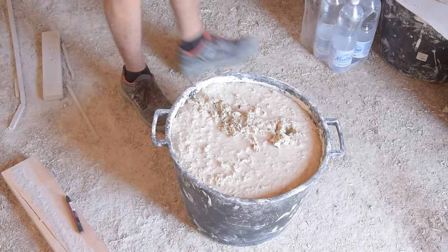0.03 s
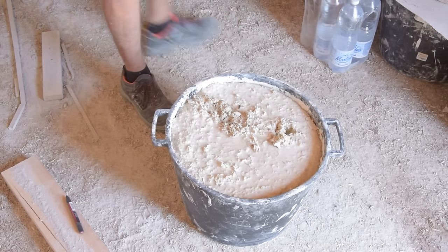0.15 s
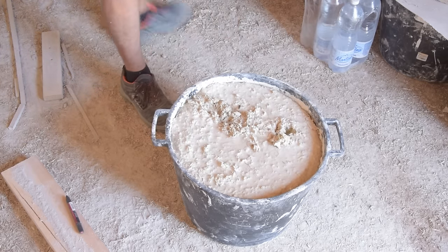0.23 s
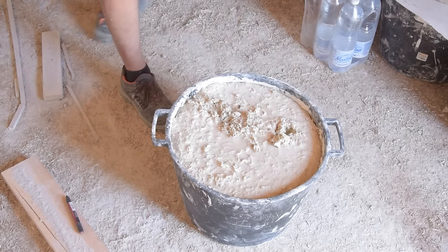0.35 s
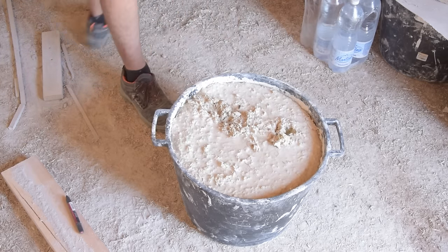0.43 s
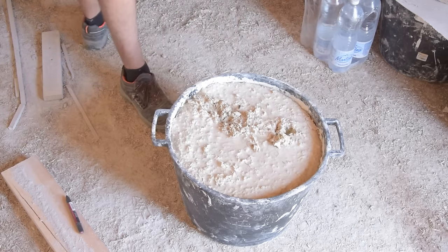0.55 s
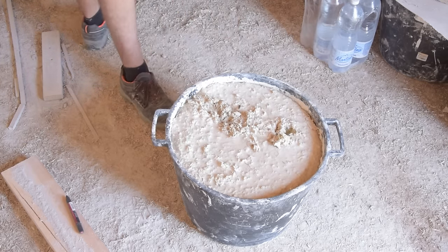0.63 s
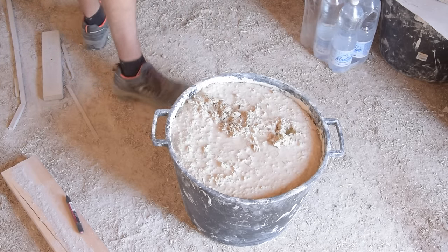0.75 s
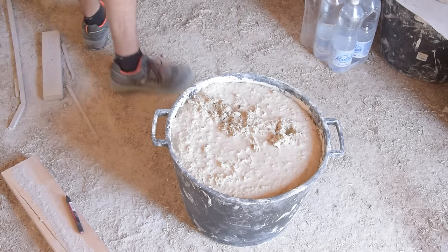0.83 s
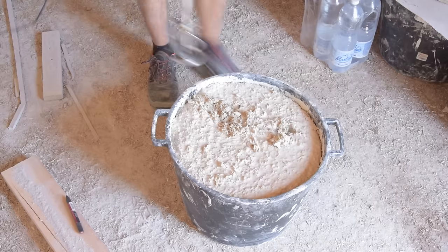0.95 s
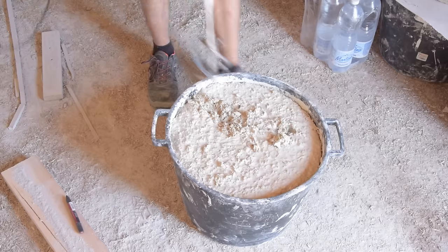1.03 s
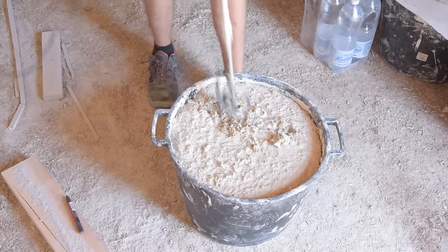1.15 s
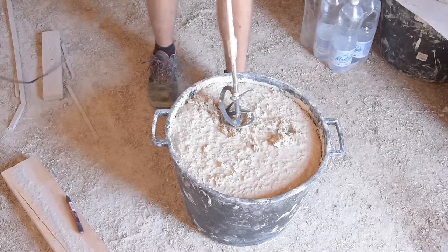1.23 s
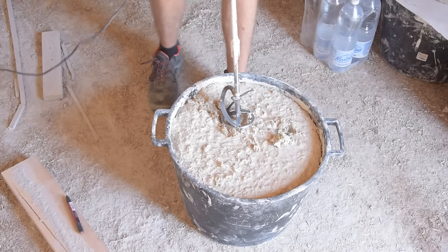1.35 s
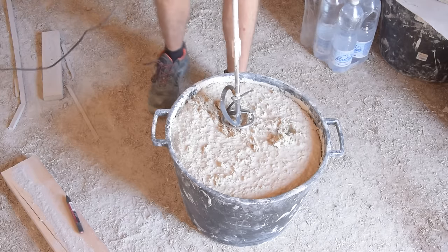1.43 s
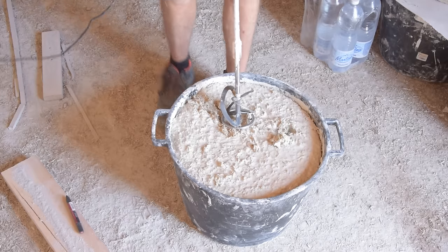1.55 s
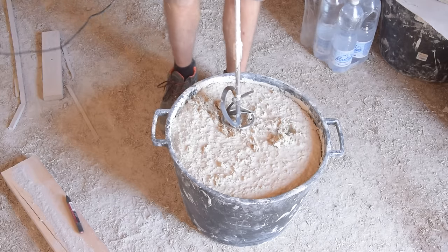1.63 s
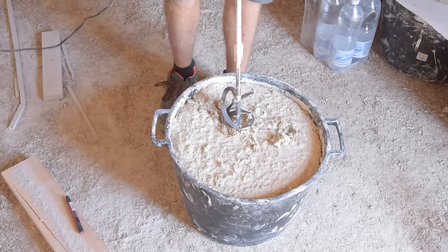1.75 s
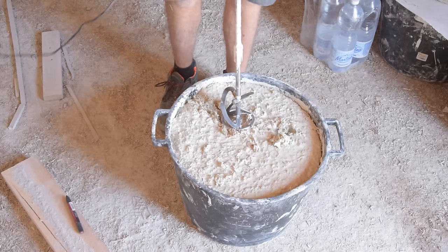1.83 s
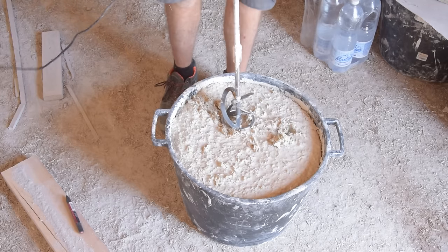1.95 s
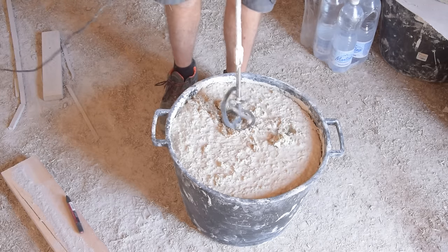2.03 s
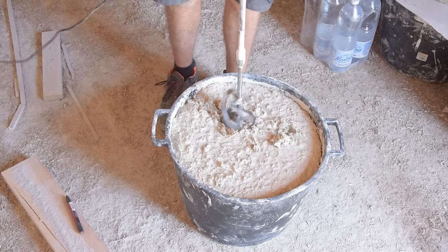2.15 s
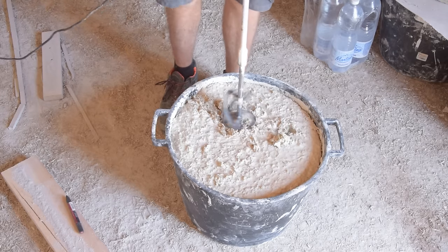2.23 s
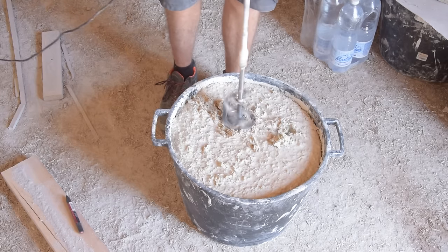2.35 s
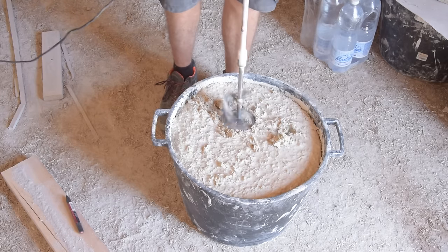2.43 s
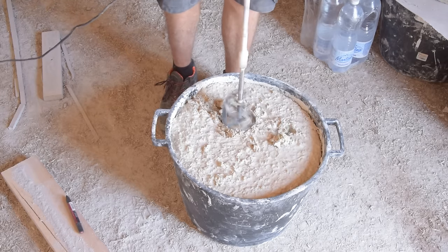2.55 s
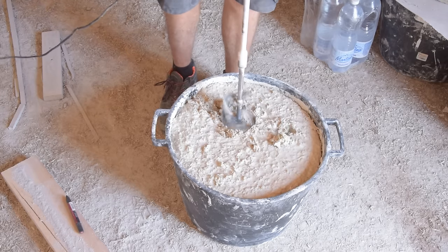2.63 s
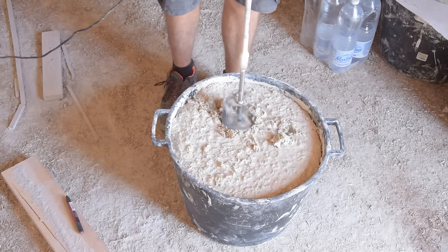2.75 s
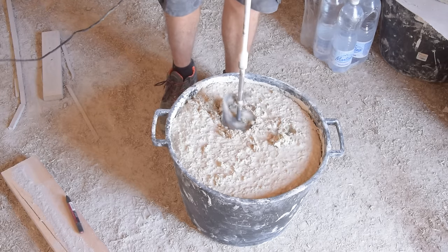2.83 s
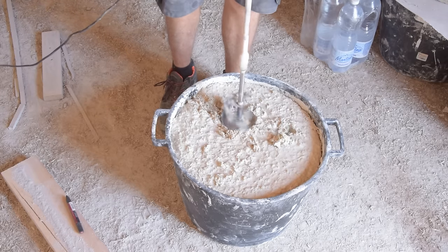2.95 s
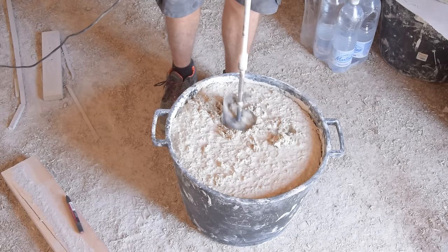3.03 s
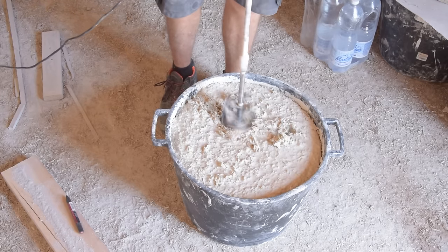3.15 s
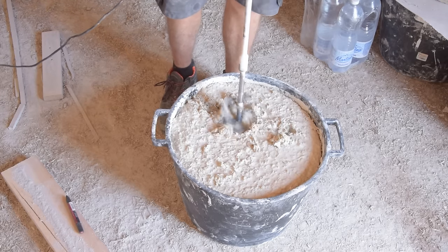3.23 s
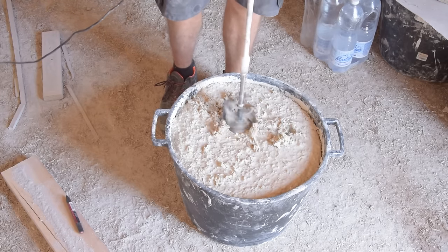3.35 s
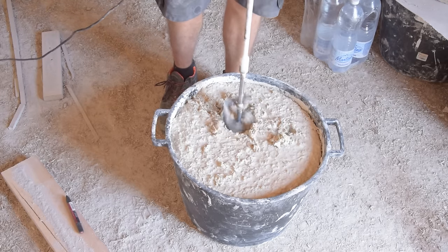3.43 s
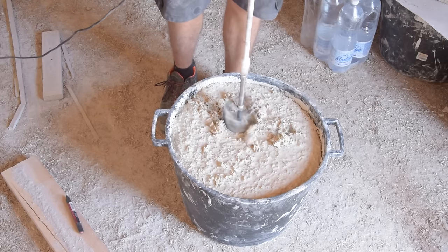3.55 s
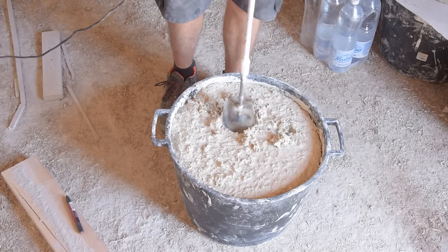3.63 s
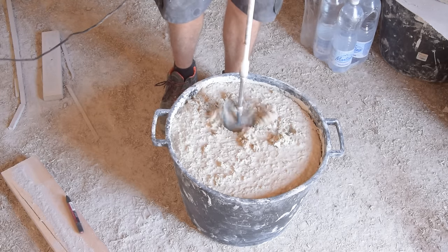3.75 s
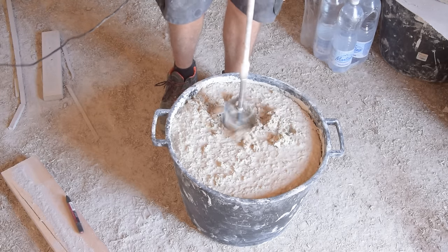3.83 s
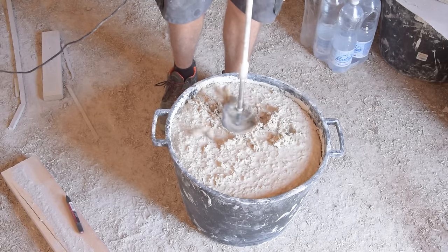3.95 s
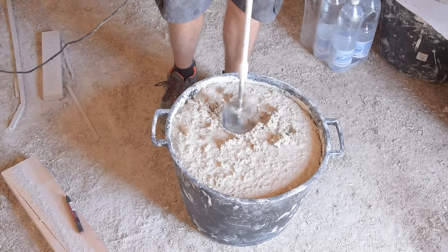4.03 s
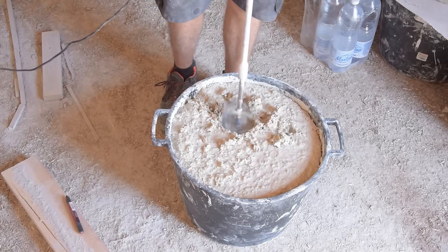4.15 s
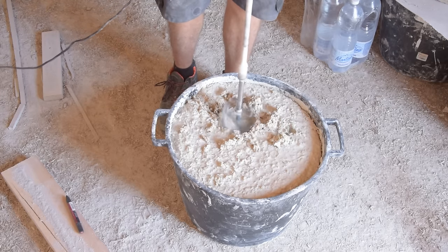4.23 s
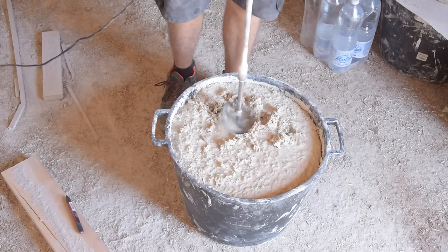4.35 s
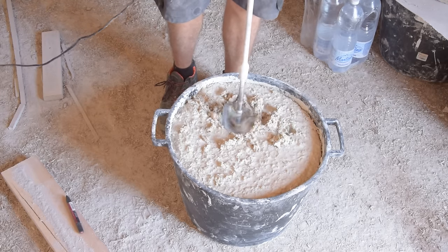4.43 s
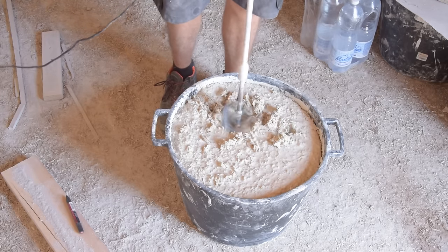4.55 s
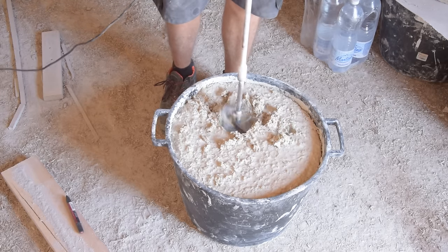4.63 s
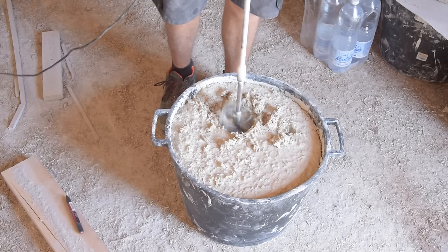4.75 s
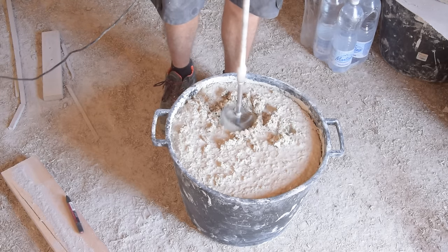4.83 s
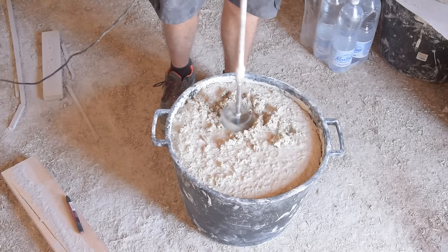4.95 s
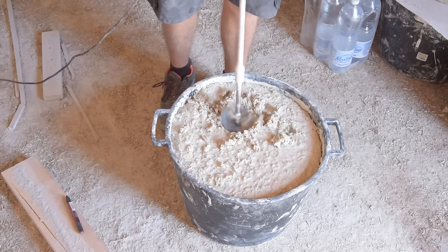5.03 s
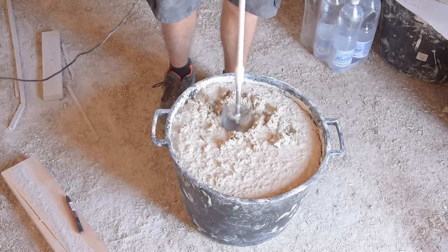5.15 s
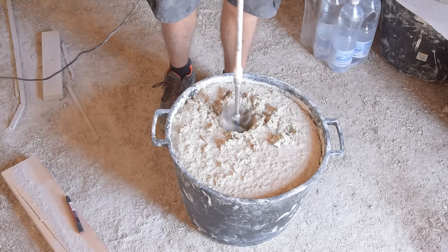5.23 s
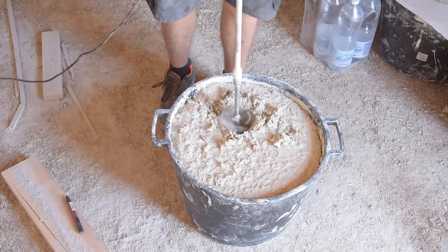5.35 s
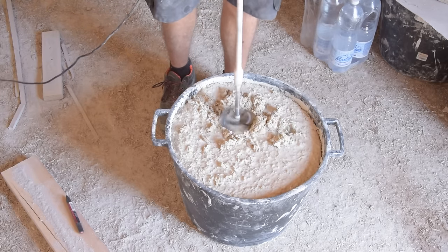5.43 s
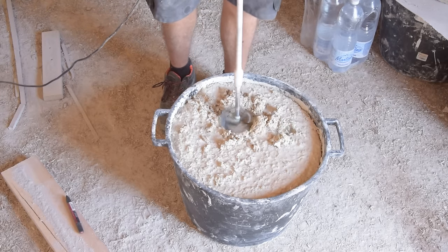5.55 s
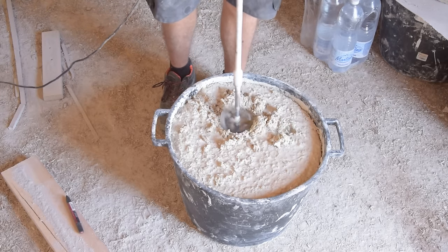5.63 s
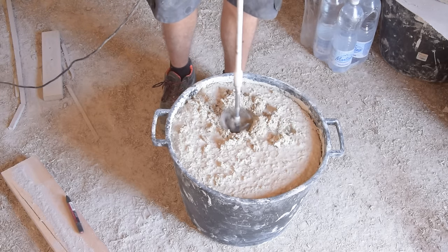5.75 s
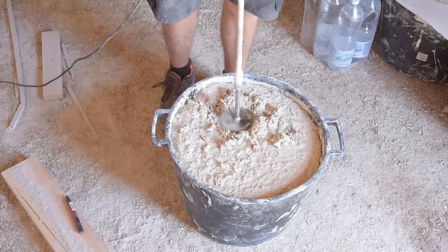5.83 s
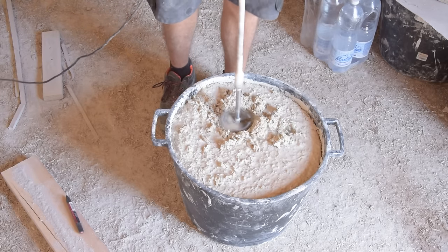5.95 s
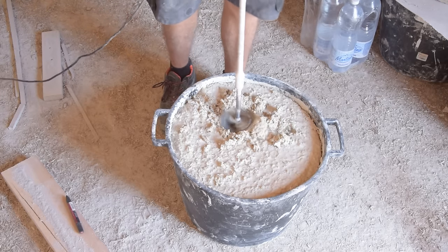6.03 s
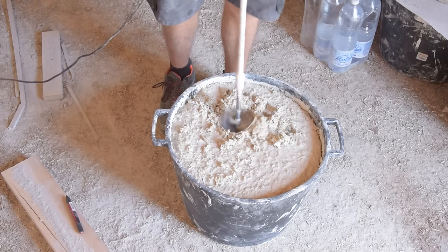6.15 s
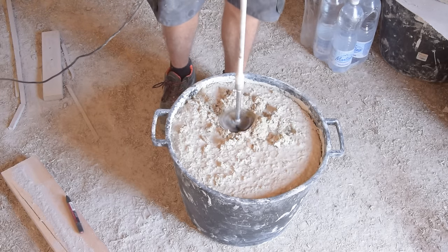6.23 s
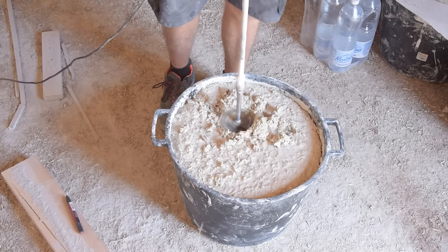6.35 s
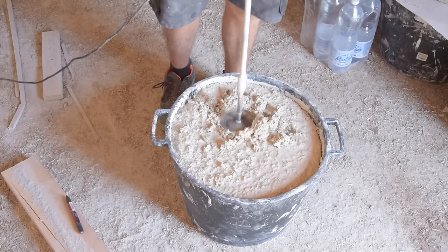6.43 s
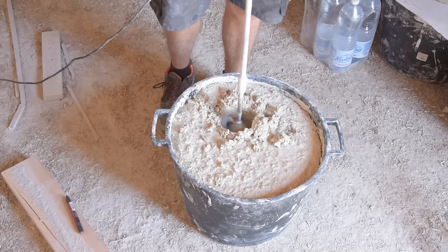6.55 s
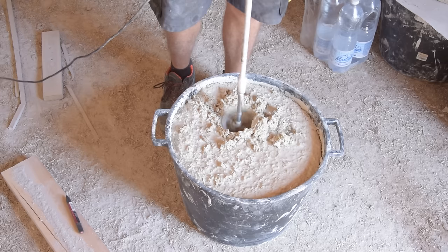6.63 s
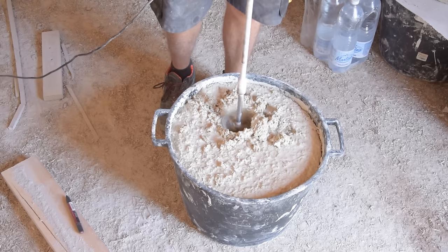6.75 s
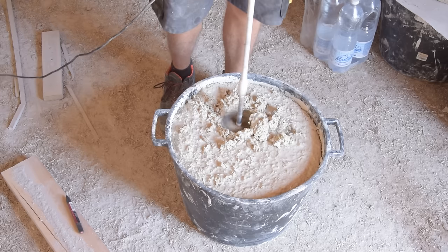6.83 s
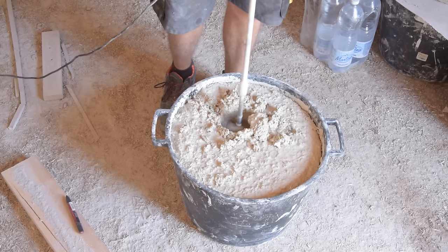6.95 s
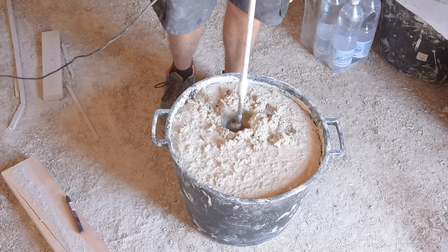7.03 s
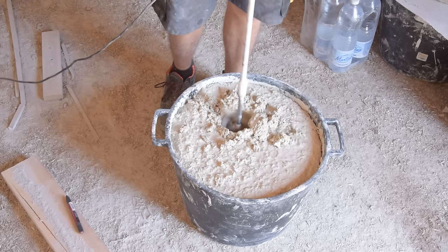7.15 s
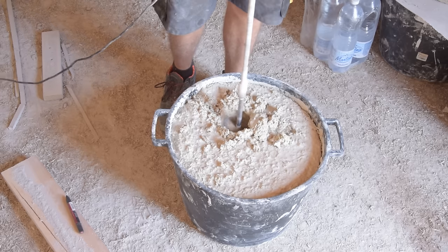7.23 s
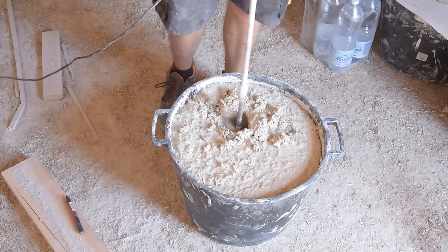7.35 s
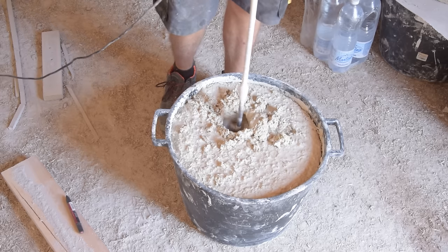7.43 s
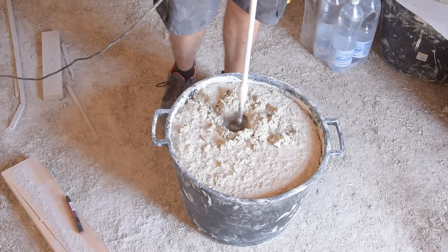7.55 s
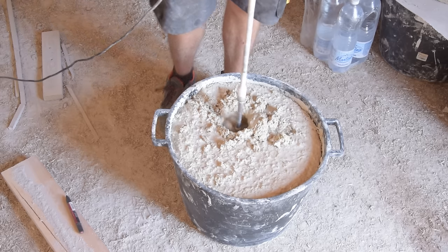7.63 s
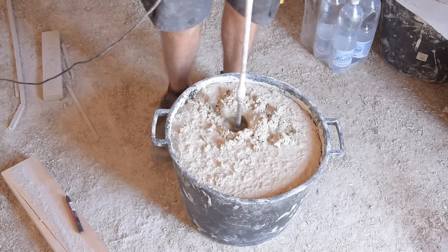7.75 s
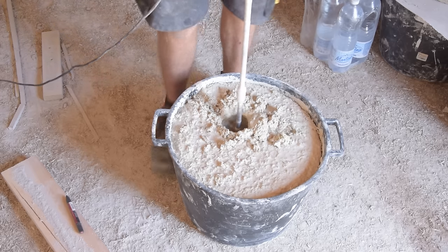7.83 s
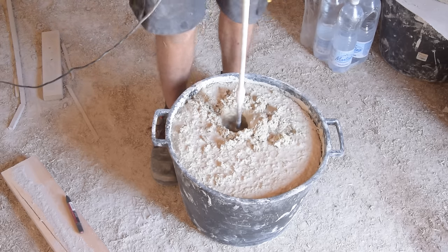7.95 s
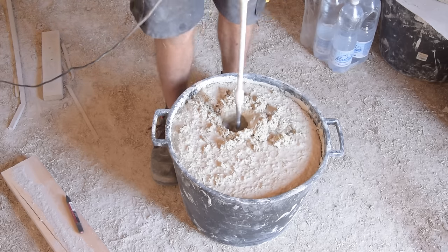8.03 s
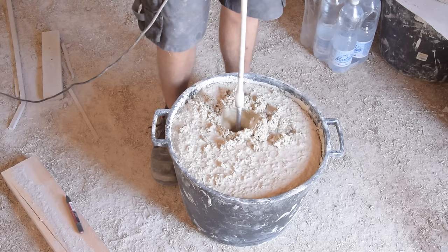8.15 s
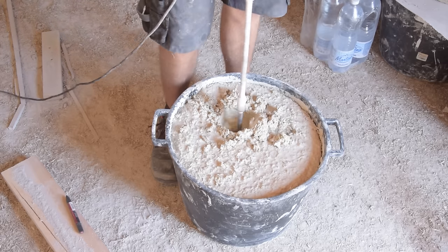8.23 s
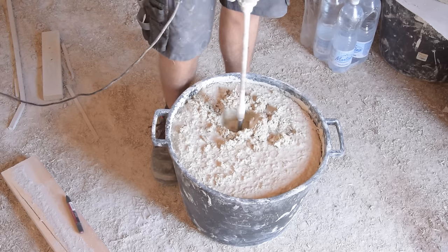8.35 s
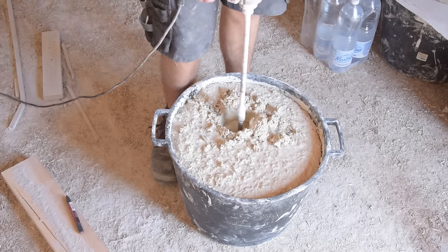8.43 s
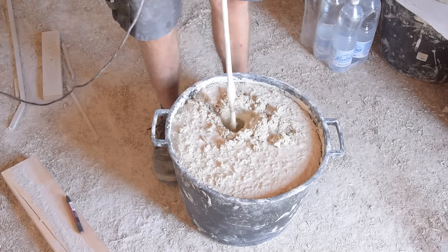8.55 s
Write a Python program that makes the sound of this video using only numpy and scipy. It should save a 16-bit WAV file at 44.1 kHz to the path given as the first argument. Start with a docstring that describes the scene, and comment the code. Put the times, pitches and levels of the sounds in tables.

```python
"""Shoes scuff over gritty concrete in a bare room; then a corded drill turns a paddle in a bucket of plaster.
It runs at part speed, speeds up and labours under load; at full speed the sound breaks off abruptly,
leaving a high whistle and hiss. Scuffs, heels and crunches are enveloped noise; rush and churn are
coloured noise mixed with grains.
Gear whines are sine lines locked to the layshaft angle, shaped by gear case resonances."""
import sys
import numpy as np
from scipy import signal
from scipy.fft import rfft, irfft
from scipy.io import wavfile
from scipy.ndimage import uniform_filter1d

SR = 44100
rng = np.random.default_rng(int(sys.argv[2]) if len(sys.argv) > 2 else 0)


def master_out(mix):
    """Clip the mix to full scale and print it as 16-bit PCM to the path in sys.argv[1]."""
    frames = np.transpose(np.atleast_2d(mix))
    ceiling = np.clip(frames, -1, 1)
    pcm = np.round(ceiling * 32767).astype(np.int16)
    wavfile.write(sys.argv[1], SR, pcm)


N = 379260
T = np.arange(N) / SR
HZ = np.fft.rfftfreq(N, 1 / SR)

# Spectra fed to colour() set shape only: their dB are relative. Event levels are dry, before room().

# room air: (frequency [Hz], relative level [dB])
AIR_SPECTRUM = [(30, -17.5), (100, -7.5), (250, -8), (500, -7.5), (1600, -6), (4000, -2), (15000, -16)]
# left-right likeness of noise: (frequency [Hz], likeness [0-1])
LIKENESS = [(300, 1), (1200, 0.99), (2600, 0.86), (5500, 0.72), (10000, 0.77)]
# microphone tilt: (frequency [Hz], left minus right [dB])
BALANCE = [(200, -0.1), (2500, -0.9), (6000, -1.1), (14000, 1)]
# reverberation: (frequency [Hz], t60 [s])
ROOM_T60 = [(150, 0.39), (530, 0.42), (1400, 0.35), (3700, 0.57), (12000, 0.46)]
EDGE_HZ = 15750

# whistle after the break: (time [s], frequency [Hz], level before the tone gains [dB])
WHISTLE_GLIDE = [(8.14, 7820, -71), (8.17, 7530, -81), (8.23, 7270, -79), (8.32, 7200, -80),
                 (8.36, 6760, -85), (8.45, 6960, -81), (8.545, 6955, -80), (8.577, 8200, -76),
                 (8.6, 8380, -76)]
# hiss under the whistle: (frequency [Hz], relative level [dB])
HISS_SPECTRUM = [(1000, -50.5), (4000, -45), (6000, -13.5), (7800, -16), (9400, -5.5), (12000, -2),
                 (14500, -3), (15700, -2.5)]

# soles scraping: (time [s], level [dB], length [s], gain above 3 kHz [dB])
SCUFFS = [(0.0, -58, 0.023, 8), (0.233, -55.5, 0.085, -1), (0.268, -53.5, 0.12, 0),
          (0.467, -64, 0.054, 9.5), (0.637, -60, 0.043, 2), (0.667, -53.5, 0.27, -1),
          (0.835, -50.5, 0.025, -1), (.885, -63, .1, 9), (1.055, -54.5, 0.043, 7), (1.24, -66.5, 0.041, 13),
          (1.35, -61.5, 0.017, 3), (1.5, -71, 0.032, 6), (1.613, -58, 0.028, 5)]
# sole on concrete: (frequency [Hz], relative level [dB])
SOLE_SPECTRUM = [(60, -40), (200, -6), (380, -6.5), (530, 0), (700, -0.5), (900, 1), (1750, -4),
                 (3000, -14), (5700, -23.5), (9700, -32), (15000, -56)]
# heels coming down: (time [s], level [dB])
HEELS = [(.172, -56.5), (.245, -61.5), (.635, -63), (.72, -56), (.836, -56), (1.059, -64)]
# heel thump: (frequency [Hz], relative level [dB])
HEEL_SPECTRUM = [(50, -27), (130, -27), (200, -3), (300, -5), (550, -5), (1000, -41)]
# grit crushed underfoot: (time [s], level [dB])
CRUNCHES = [(0.845, -42.5), (0.862, -43), (0.917, -47), (1.079, -48), (1.271, -50.5), (1.63, -51.5),
            (1.645, -55)]
# one crushed grain: (frequency [Hz], relative level [dB])
CRUNCH_SPECTRUM = [(300, -23), (900, 5), (2200, 4), (3000, -15), (3700, -9), (6000, -23), (14000, -40)]
# faint squeak between steps: (time [s], level before a 0.5 dB cut [dB])
SQUEAK_LEVEL = [(.93, -110), (.96, -81), (1.01, -80), (1.04, -71), (1.07, -75), (1.1, -120)]
SQUEAK_HZ = 1460
SCUFF_RISE_SHARE = 0.27  # share of a scrape spent swelling
HEEL_RISE_S, HEEL_DECAY_S = 0.0073, 0.045
HUSH_S, BREAK_S = 0.933, 8.132

# trigger squeezes: (time [s], layshaft speed gained [rev/s], motor lag [s])
SQUEEZES = [(1.914, 37, .275), (3.553, 19.5, .135)]
# plaster drag on the paddle: (time [s], layshaft speed lost [rev/s])
LOAD = [(2.0, 0), (2.3, .9), (2.56, 0), (3.29, 3.9), (3.7, 3.8), (3.96, 2.25), (4.7, 2.54), (4.94, 1.98),
        (5.5, 2.63), (5.76, 2.65), (6.26, 3.14), (6.92, 4.64), (7.54, 3.87), (7.78, 2.77), (8.0, .81),
        (8.13, .51)]
# working state: (time [s], state [0 part speed, 1 full speed, 2 labouring; held beyond the ends])
STATE = [(3.56, -0.5), (3.74, 1.57), (6.05, 1.4), (6.4, 6), (7.6, 6), (8.1, 1.3)]
PINION_TEETH = 7
FULL_SPEED_REV_S = 54  # layshaft
ARMATURE_RATIO = 34 / 5  # armature turns per layshaft turn

# churning plaster: (time [s], level before random swell [dB])
CHURN_LEVEL = [(2.0, -81), (2.3, -62), (2.75, -57), (3.45, -59), (4.2, -51), (6.4, -50.5), (7.75, -50.5),
               (8.12, -50.5)]
# plaster in the bucket: (frequency [Hz], relative level [dB])
CHURN_SPECTRUM = [(100, -45.5), (220, -24.5), (330, -19), (480, -4), (720, 9.5), (1000, -14.5),
                  (1600, -14.5), (4000, -35.5)]
# paddle bumping in the bucket: (frequency [Hz], relative level [dB])
BUMP_SPECTRUM = [(20, -11), (70, -0.5), (160, -4.5), (300, -9), (800, -41.5)]

# fan, brushes, rattling teeth: (frequency [Hz], relative level at part speed [dB], at full speed [dB])
RUSH_SPECTRA = [(100, -73, -69.5), (200, -76.5, -64.5), (295, -48, -43.5), (546, -38, -32.5),
                (730, -38.5, -32.5), (1236, -32.5, -25.5), (2480, -24, -25.5), (2840, -33, -30),
                (4420, -33.5, -28.5), (6600, -44, -38), (7530, -36, -34.5), (9080, -48.5, -40.5),
                (11720, -55, -50.5), (15570, -64, -61.5)]
BRUSHES_S, TAKE_UP_S = 1.945, 0.13  # brushes start to hiss, time constant of the rise
RUSH_DB = -42.5  # at full speed, before the gains in rush()
LOAD_MUFFLES_DB = 0.1  # rush lost per rev/s of drag
WHINE_GROWTH_DB, RUSH_GROWTH_DB = 51, 26.5  # per tenfold speed

# gear case resonances: (frequency [Hz], line level at full speed [dB])
CASE = [(200, -74.5), (370, -60), (750, -56.5), (950, -41), (1150, -39), (1500, -37), (1890, -38),
        (2300, -36), (2640, -39), (3000, -50), (3350, -51.5), (3800, -49), (4200, -51.5), (4750, -51),
        (5300, -61.5), (6200, -69.5), (7100, -63.5), (7900, -55), (8400, -62), (9000, -67.5),
        (12000, -79.5)]
# armature, its 5 teeth, commutator:
# (multiple of armature speed, level over the case at part speed [dB], full speed [dB], labouring [dB])
ARMATURE = [(1, -1.5, -2.5, 1), (2, 7, 7, 6), (3, 6.5, -21.5, -25.5), (5, 1.5, 5.5, 1), (10, 7, 2, 5.5),
            (12, 4, -19, -1), (15, 3, 3.5, 15.5), (30, 1, 11, 21.5)]
# swell of the pinion's 2nd harmonic, strongest just before the break: (time [s], level over the case [dB])
SECOND_SWELL = [(7.8, -3), (7.9, -4), (7.97, 15.5), (8.13, 13)]
# swell of the pinion's 3rd harmonic: (time [s], level over the case [dB])
THIRD_SWELL = [(3.5, 3.5), (4.0, -8), (5.1, 8), (6.15, -6.5), (6.45, 4), (6.97, -12), (7.25, -2.5),
               (8.1, -3)]
# swell of the pinion's 4th harmonic: (time [s], level over the case [dB])
FOURTH_SWELL = [(2.7, 3), (3.35, -3.5), (3.65, 4), (3.9, -3), (5.75, 3.5), (6.5, -0.5), (8.0, 0.5)]
# swell of the pinion's 5th harmonic: (time [s], level over the case [dB])
FIFTH_SWELL = [(3.5, -1), (4.05, -0.5), (4.35, 0.5), (5.6, -8.5), (6.4, 5.5), (7.25, 3), (8.0, -4.5)]
# swell of the pinion's 6th harmonic: (time [s], level over the case [dB])
SIXTH_SWELL = [(3.1, -2.5), (3.9, -0.5), (5.3, 2), (5.9, 2.5), (6.25, -7.5), (6.7, -6.5), (7.0, -1),
               (8.1, -1.5)]
# swell of the pinion's 7th harmonic: (time [s], level over the case [dB])
SEVENTH_SWELL = [(3.5, 0), (4.1, 1.5), (4.8, -4), (5.15, -12), (5.5, 1), (6.45, 4), (6.95, -4), (7.45, 3.5),
                 (8.0, -5)]
# extra swell of the armature's 15th multiple: (time [s], gain [dB])
SHRILL_SWELL = [(6.1, 3.5), (6.9, -6.5), (7.2, 3.5), (7.6, 5.5), (8.1, -2.5)]

# trigger closing and gears taking up: (time [s], level before a 4 dB cut [dB], decay [s])
KNOCK = (1.914, -58.5, 0.016)
# knock of the casing: (frequency [Hz], relative level [dB])
KNOCK_SPECTRUM = [(120, -35), (300, -14), (500, 8), (800, -12), (2000, -15), (4000, -29)]


def amp(db):
    """Decibels to gain."""
    return 10 ** (np.asarray(db) / 20)


def evened(x):
    """Scales to rms 1."""
    return x / np.sqrt(np.mean(abs(x) ** 2) + 1e-20)


def curve(rows, axis=1):
    """One column of a time table, at every sample."""
    rows = np.array(rows, float)
    return np.interp(T, rows[:, 0], rows[:, axis])


def read(rows, hz, axis=1):
    """One column of a spectrum, on a log-frequency axis."""
    rows = np.array(rows, float)
    return np.interp(np.log(hz + 1), np.log(rows[:, 0] + 1), rows[:, axis])


def wander(rate_hz):
    """Random drift of rms 1, rolled off above the given rate."""
    hz = np.fft.rfftfreq(8192, N / SR / 8192)
    slow = irfft(rfft(rng.standard_normal(8192)) / (1 + (hz / rate_hz) ** 2))
    return np.interp(T, np.linspace(0, T[-1], len(slow)), evened(slow))


def noise_pair():
    """Two unrelated white noises."""
    return rng.standard_normal((2, N))


def colour(pair, rows, axis=1):
    """Gives two unrelated signals a spectrum and makes them a close left-right pair of rms 1."""
    mid, side = rfft(pair) * amp(read(rows, HZ, axis=axis))
    same = np.clip(read(LIKENESS, HZ), 0, 1)
    mid = mid * np.sqrt(1 + same)
    side = side * np.sqrt(1 - same)
    return evened(irfft(np.array([mid + side, mid - side]), N))


def grains(per_s, spread_db):
    """Two unrelated trains of random clicks, a few of them large; rms 1."""
    size = amp(spread_db * np.minimum(rng.exponential(1, (2, N)), 4))
    hits = rng.random((2, N)) < per_s / SR
    return evened(size * rng.standard_normal((2, N)) * hits)


def stroke(start_s, rise_s, decay_s):
    """Envelope: squared ramp up, then exponential decay."""
    age = T - start_s
    return np.clip(age / rise_s, 0, 1) ** 2.0 * np.exp(-np.clip((age - rise_s) / decay_s, 0, 40))


def until(end_s, fade_s):
    """Gate: 1 up to the end time, then exponential decay."""
    return np.exp(-np.clip((T - end_s) / fade_s, 0, 40))


def room(pair, wet_db):
    """Bare walls: a dense noise tail in which each band dies at its own speed."""
    hz, t, z = signal.stft(rng.standard_normal((2, SR // 2)), SR, nperseg=256)
    decay = amp(-60 * t / read(ROOM_T60, hz)[:, None])
    mid, side = signal.istft(z * decay * (t > .004), SR, nperseg=256)[1]
    tail = (mid + .09 * np.array([side, -side])) / np.linalg.norm(mid)
    wet = signal.fftconvolve(pair, tail, axes=1)[:, :N]
    return (pair + amp(wet_db) * wet) / np.hypot(1, amp(wet_db))


def room_air():
    """Still air: steady coloured noise."""
    return amp(-97.0) * colour(noise_pair(), AIR_SPECTRUM)


def whistle():
    """Thin wavering whistle and its louder octave over a high hiss, from the break on."""
    phase = 2 * np.pi * np.cumsum(curve(WHISTLE_GLIDE, axis=1)) / SR
    fundamental = amp(3.0) * np.sin(phase + .5 * wander(80))
    octave = amp(10) * np.sin(2 * phase + 1.5 * wander(150))
    tone = amp(curve(WHISTLE_GLIDE, axis=2)) * (fundamental + octave)
    hiss = amp(-67.5) * colour(noise_pair(), HISS_SPECTRUM)
    return (T > BREAK_S) * (tone + hiss)


def footsteps():
    """Heels thump, soles scrape over grit and grains crack; the shuffling breaks off once."""
    scrape = colour(noise_pair() + 0.45 * grains(700, 2.7), SOLE_SPECTRUM)
    grit = signal.sosfilt(signal.butter(2, 3000, "high", fs=SR, output="sos"), scrape)
    heel = colour(noise_pair(), HEEL_SPECTRUM)
    crack = colour(noise_pair(), CRUNCH_SPECTRUM)

    early = amp(-67.5) * scrape  # a steady drag underlies the first steps
    late = np.zeros((2, N))
    for s, db, length_s, grit_db in SCUFFS:
        group = early if s < HUSH_S else late
        envelope = stroke(s, SCUFF_RISE_SHARE * length_s, (1 - SCUFF_RISE_SHARE) * length_s)
        group += amp(db) * envelope * (scrape + (amp(grit_db) - 1) * grit)
    for s, db in HEELS:
        group = early if s < HUSH_S else late
        group += amp(db) * stroke(s, HEEL_RISE_S, HEEL_DECAY_S) * heel
    for s, db in CRUNCHES:
        group = early if s < HUSH_S else late
        group += amp(db) * stroke(s, 0.00047, 0.0027) * crack

    # abrupt drop of the early steps, then a faint remnant
    hush = until(HUSH_S, 0.00067) + amp(-24) * (T > HUSH_S) * until(HUSH_S, 0.29)
    squeak_phase = 2 * np.pi * SQUEAK_HZ * T + 1.3 * wander(60.7)
    squeak = amp(curve(SQUEAK_LEVEL) - 0.5) * np.sin(squeak_phase)
    return room(early, wet_db=-2.0) * hush + room(late, wet_db=3) + squeak


def motor_speed():
    """Layshaft speed [rev/s]: each squeeze closes in on a higher speed; the plaster holds it back."""
    free = sum(gain * (1 - until(s, lag_s)) for s, gain, lag_s in SQUEEZES)
    return np.maximum(uniform_filter1d(free - curve(LOAD), 1500), .5)


def layshaft(flutter=0.001219, drag=0.0011):
    """Layshaft speed and angle, paddle angle; speed ripples once per turn of the geared-down paddle."""
    speed = motor_speed()
    paddle = 2 * np.pi * np.cumsum(speed) / SR * PINION_TEETH / 47
    speed = speed * (1 + flutter * wander(25.7) + drag * np.sin(paddle))
    angle = 2 * np.pi * np.cumsum(speed) / SR
    return speed, angle, paddle


def churn(paddle):
    """Two blades shove thick plaster round, twice per paddle turn; dull bumps as they sink in."""
    slop = colour(noise_pair() + 0.55 * grains(200, 1.9), CHURN_SPECTRUM)
    level_db = curve(CHURN_LEVEL) + 1.2 * np.sin(2 * paddle) + 0.77 * wander(17)
    bumps = amp(-86) * colour(grains(13, 3), BUMP_SPECTRUM) * stroke(3.7, 1.2, 2.2)
    return slop * amp(level_db) + bumps


def rush_level(speed):
    """Rush gain: fades in as the brushes take hold, grows with speed, sinks a little under load."""
    growth_db = RUSH_GROWTH_DB * np.log10(speed / FULL_SPEED_REV_S)
    db = RUSH_DB + growth_db - LOAD_MUFFLES_DB * curve(LOAD) + 0.77 * wander(33)
    return amp(db) * (1 - until(BRUSHES_S, TAKE_UP_S))


def rush(speed, angle, state, repeat=0.28, rattle=0.16, bite=0.48, part_db=10, full_db=8.0):
    """Fan and brush noise, tooth flaws repeating each layshaft turn; every pinion tooth gives it a push."""
    flaws = rng.standard_normal((2, 700))
    flaws = flaws - flaws.mean(axis=1, keepdims=True)
    place = angle / (2 * np.pi) % 1
    repeating = np.array([np.interp(place, np.linspace(0, 1, len(row)), row) for row in flaws])
    drive = noise_pair() + repeat * evened(repeating) + rattle * grains(700, 1.6)
    drive = drive * (1 + bite * np.cos(PINION_TEETH * angle)) * (1 + 0.12 * np.cos(2 * angle))
    full = np.clip(state, 0, 1)
    part_noise = (1 - full) * amp(part_db) * colour(drive, RUSH_SPECTRA, axis=1)
    full_noise = full * amp(full_db) * colour(drive, RUSH_SPECTRA, axis=2)
    return room(part_noise + full_noise, wet_db=0) * rush_level(speed)


def whine(order, db, angle, paddle, throb, fading=0.29, wobble=0.22, width=0.0018, fading_hz=14):
    """One gear line: wobbles each layshaft turn, throbs with the paddle, fades at random; high orders wider."""
    start, lag, ear, tilt = rng.uniform(0, 2 * np.pi, 4)
    level = amp(db) * (1 + throb * np.sin(paddle + lag)) * np.sqrt(2 / (1 + 2 * fading ** 2))
    phase = order * angle + start + wobble * np.sin(angle + tilt)
    in_phase = (1 + fading * wander(fading_hz)) * np.cos(phase)
    quadrature = fading * wander(fading_hz) * np.sin(phase)
    line = level * (in_phase + quadrature)
    # side part runs 1 Hz sharp, so the ears drift apart
    side = min(width * order, .4) * level * np.cos(phase + ear + 2 * np.pi * T)
    return np.array([line + side, line - side])


def gears(speed, angle, paddle, state, throb=0.2, drift_db=1.2, count=23):
    """Pinion and armature harmonics ring the gear case, louder with speed; the room smears their glides."""
    swells = {2: SECOND_SWELL, 3: THIRD_SWELL, 4: FOURTH_SWELL,
              5: FIFTH_SWELL, 6: SIXTH_SWELL, 7: SEVENTH_SWELL}
    growth_db = WHINE_GROWTH_DB * np.log10(speed / FULL_SPEED_REV_S)
    lines = np.zeros((2, N))
    for k in range(2, count):
        order = k * PINION_TEETH
        swell_db = curve(swells[k]) if k in swells else drift_db * wander(1.4)
        depth = np.minimum(throb * amp(-swell_db), .7)  # a line throbs more deeply as it fades
        line_db = growth_db + read(CASE, order * speed) + swell_db
        lines += whine(order, line_db, angle, paddle, depth)
    for multiple, *state_dbs in ARMATURE:
        order = round(multiple) * ARMATURE_RATIO
        swell_db = np.interp(state, np.arange(3), state_dbs)
        if round(multiple) == 15:
            swell_db = swell_db + curve(SHRILL_SWELL)
        line_db = growth_db + read(CASE, order * speed) + swell_db
        lines += whine(order, line_db, angle, paddle, throb)

    # reflections still carry the earlier pitch and beat against the direct sound
    acceleration = abs(np.gradient(uniform_filter1d(motor_speed(), 6000))) * SR  # rev/s per s
    least_blur = .4 * (1 - np.clip(state, 0, 1))
    blur = np.clip((acceleration - 6) / 25, least_blur, .95)
    return np.sqrt(1 - blur ** 2) * lines + blur * room(lines, wet_db=16)


def drill():
    """Trigger knock, then gears, rush and churn, with a brief click where the sound breaks off."""
    speed, angle, paddle = layshaft()
    state = curve(STATE)
    start_s, knock_db, decay_s = KNOCK
    knock = amp(knock_db - 4.0) * stroke(start_s, 0.0037, decay_s) * colour(noise_pair(), KNOCK_SPECTRUM)
    knock = room(knock, wet_db=-10.5)
    running = gears(speed, angle, paddle, state) + rush(speed, angle, state) + churn(paddle)
    onset = np.clip((T - start_s) / 0.016, 0, 1)
    break_off = 0.94 * until(BREAK_S, 0.00014) + 0.036 * until(BREAK_S, 0.01)
    click = amp(-31.5) * stroke(BREAK_S - .001, 0.00044, 0.00051)  # one-sided pulse
    return knock + running * onset * break_off + click


def scene():
    """Room air, whistle, steps and drill summed."""
    return room_air() + whistle() + footsteps() + drill()


def record(dry):
    """Slight left-right tilt of the microphones, then the band limit."""
    tilt_db = np.array([[.5], [-.5]]) * read(BALANCE, HZ)
    tilted = irfft(rfft(dry) * amp(tilt_db), N)
    lowpass = signal.firwin(511, EDGE_HZ, window=("kaiser", 9), fs=SR)
    return signal.oaconvolve(tilted, lowpass[None], "same")


dry = scene()
out = record(dry)
master_out(out)
```